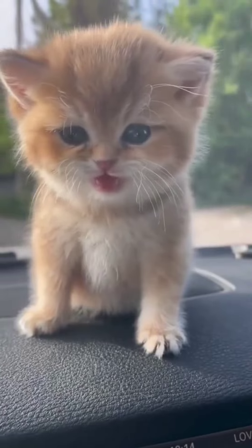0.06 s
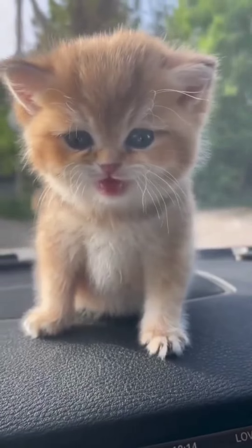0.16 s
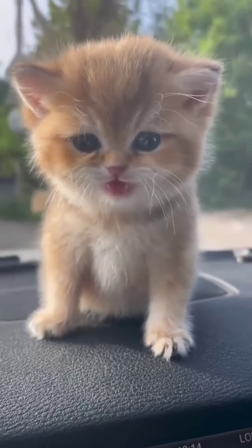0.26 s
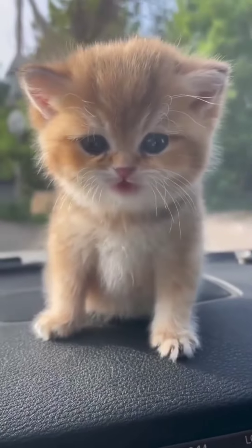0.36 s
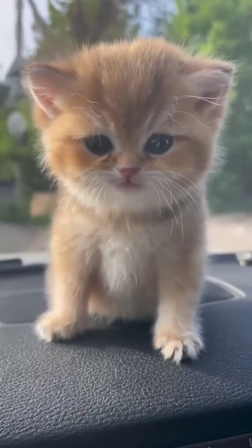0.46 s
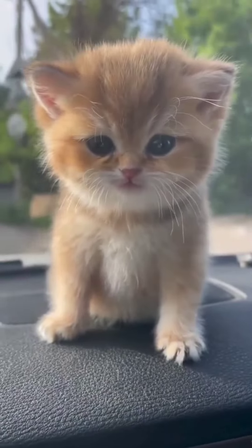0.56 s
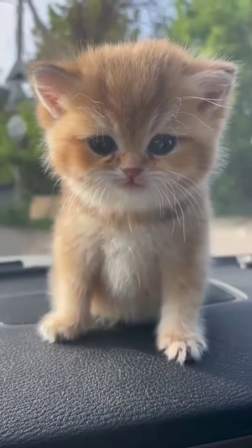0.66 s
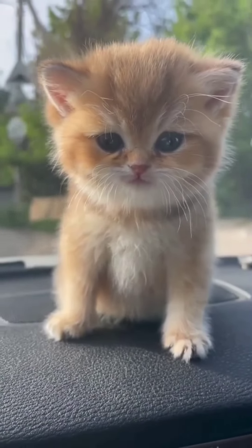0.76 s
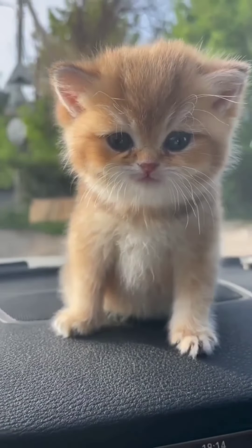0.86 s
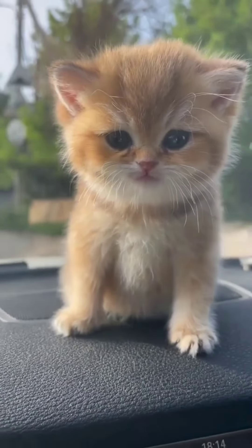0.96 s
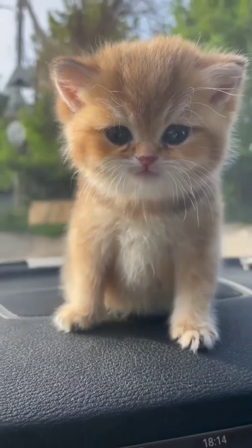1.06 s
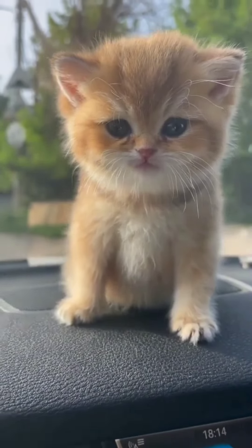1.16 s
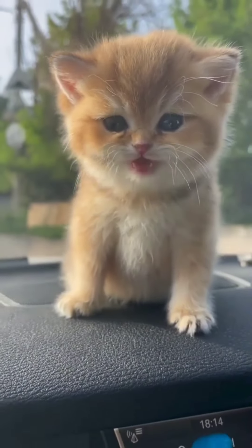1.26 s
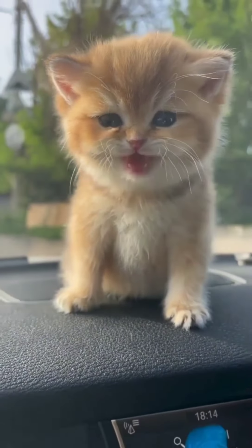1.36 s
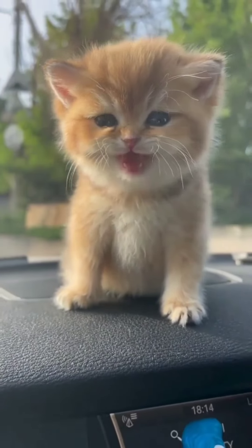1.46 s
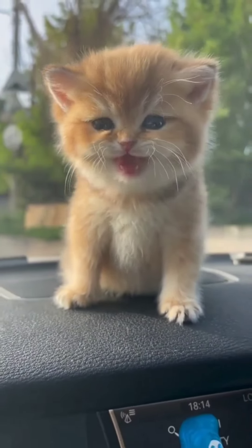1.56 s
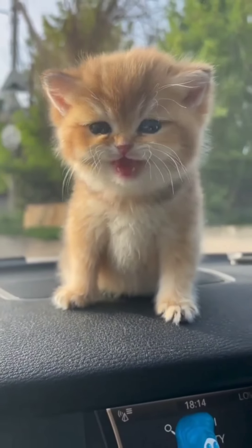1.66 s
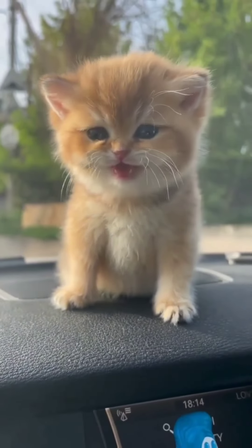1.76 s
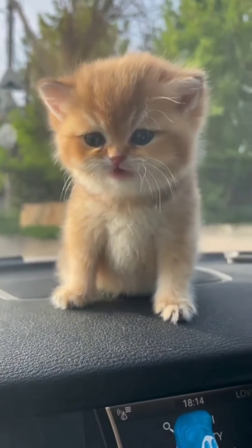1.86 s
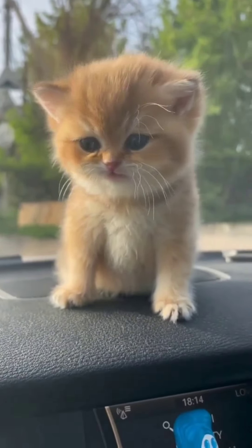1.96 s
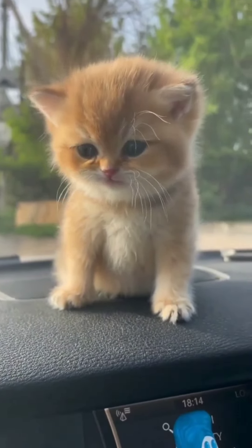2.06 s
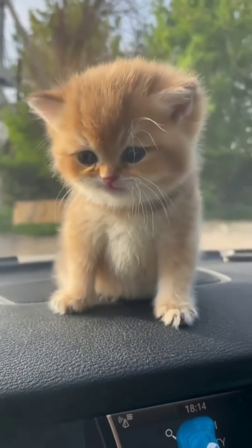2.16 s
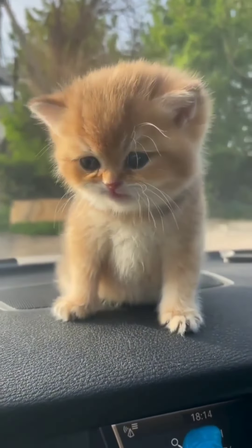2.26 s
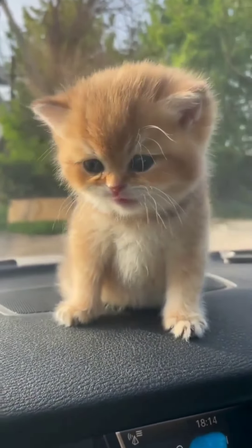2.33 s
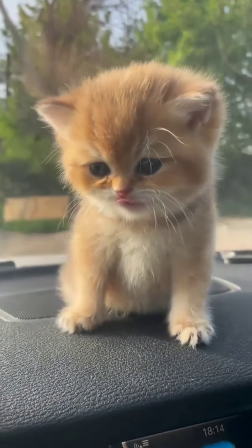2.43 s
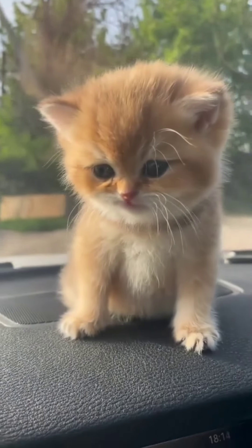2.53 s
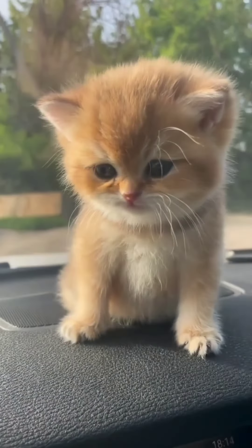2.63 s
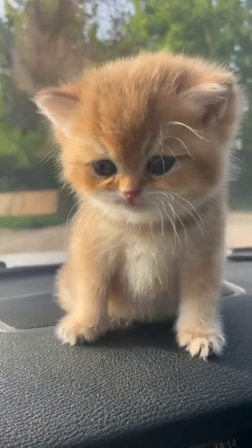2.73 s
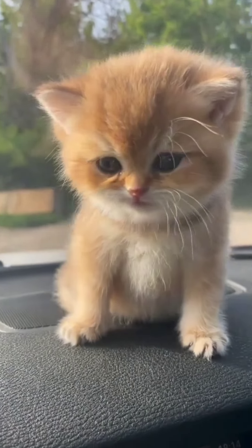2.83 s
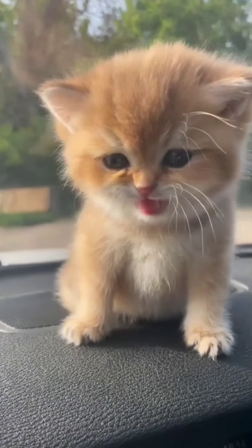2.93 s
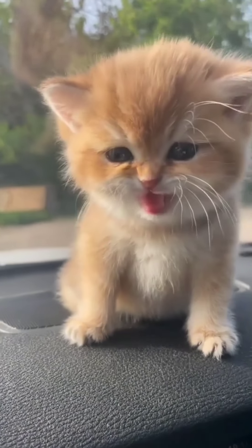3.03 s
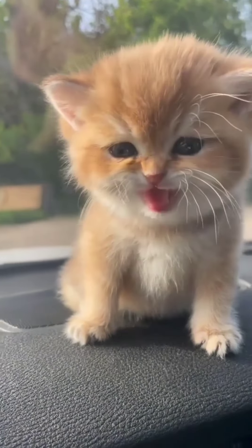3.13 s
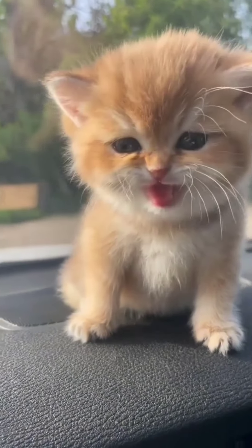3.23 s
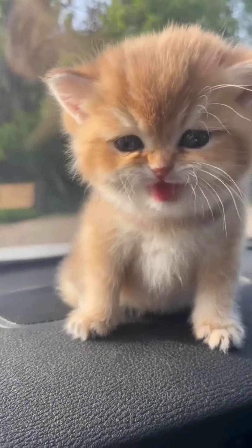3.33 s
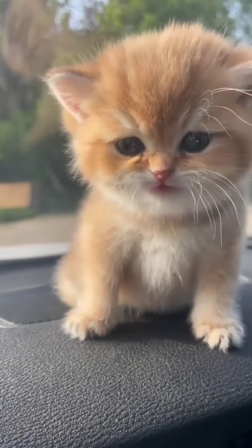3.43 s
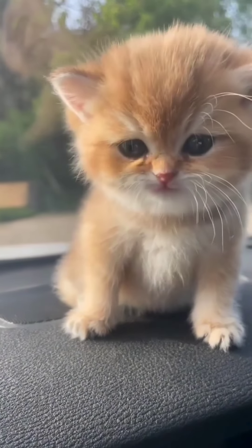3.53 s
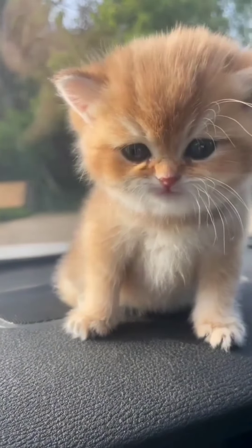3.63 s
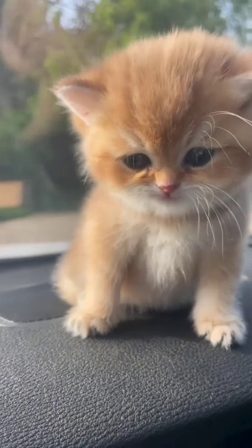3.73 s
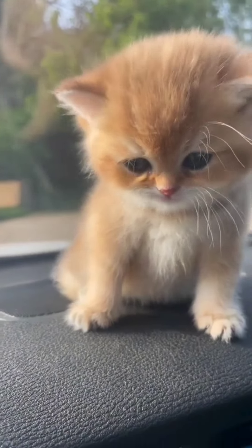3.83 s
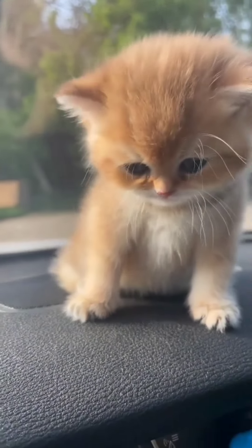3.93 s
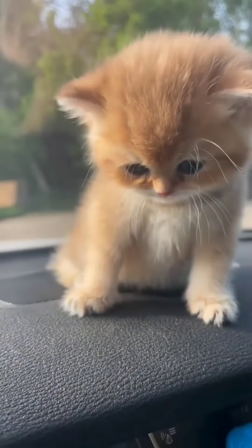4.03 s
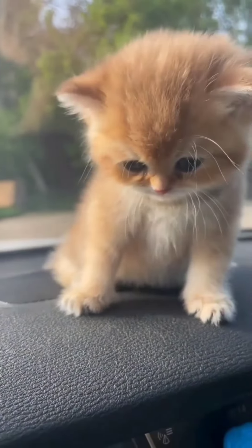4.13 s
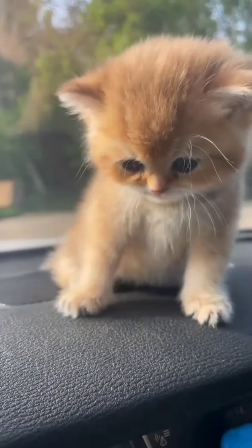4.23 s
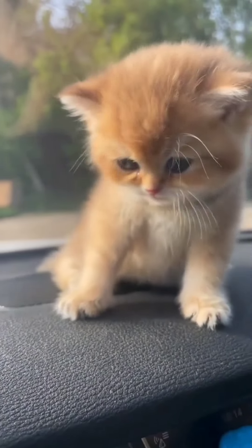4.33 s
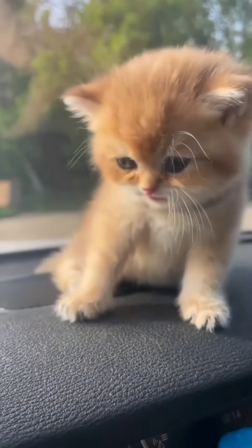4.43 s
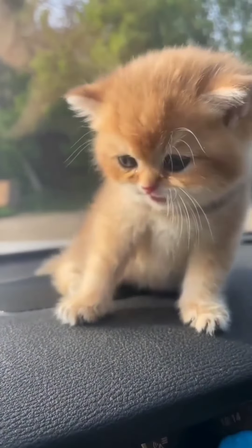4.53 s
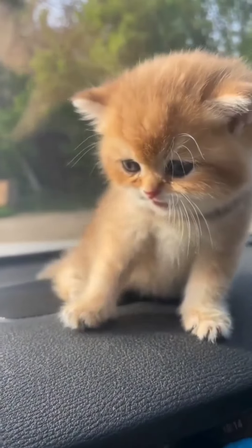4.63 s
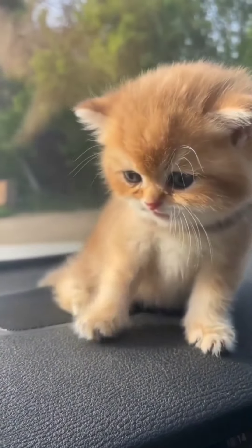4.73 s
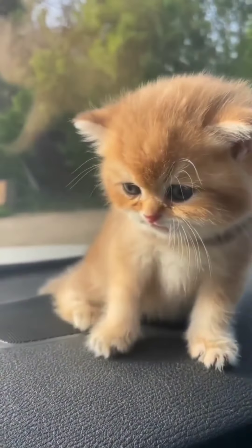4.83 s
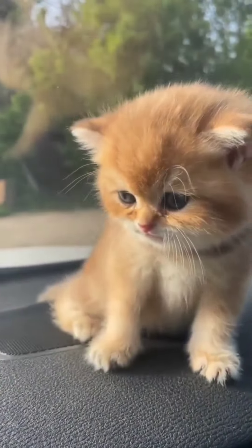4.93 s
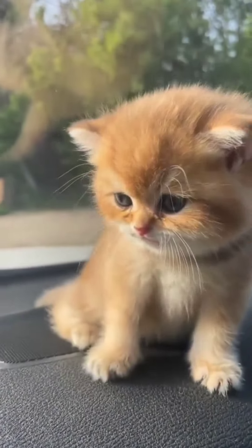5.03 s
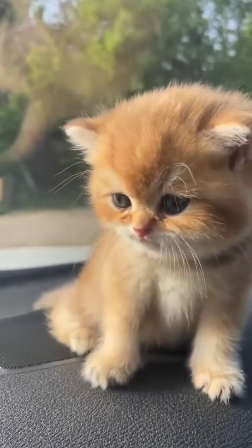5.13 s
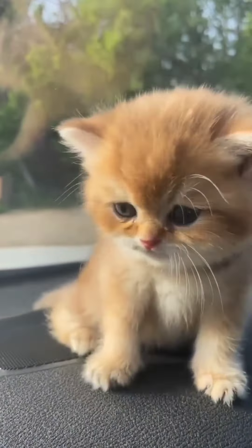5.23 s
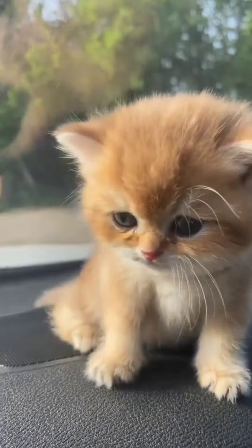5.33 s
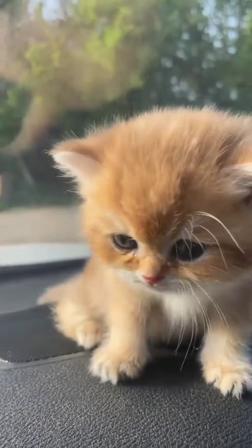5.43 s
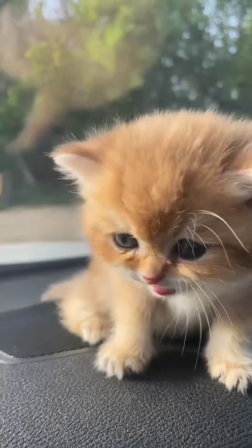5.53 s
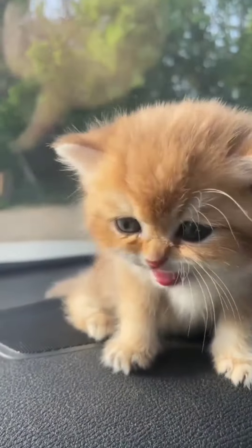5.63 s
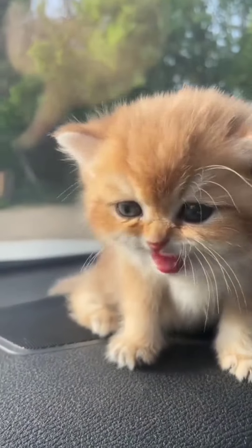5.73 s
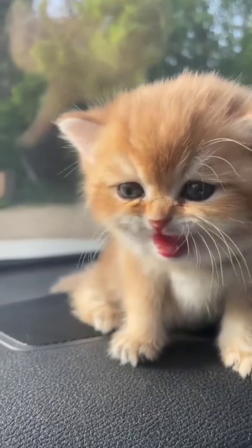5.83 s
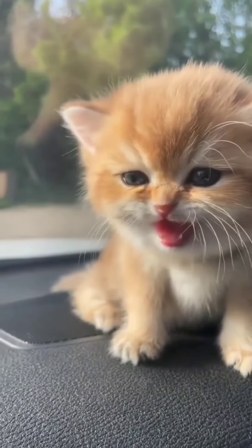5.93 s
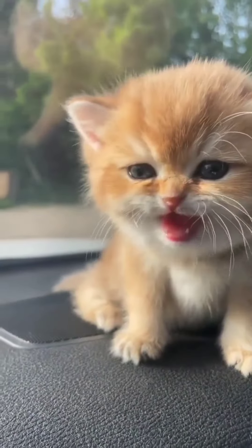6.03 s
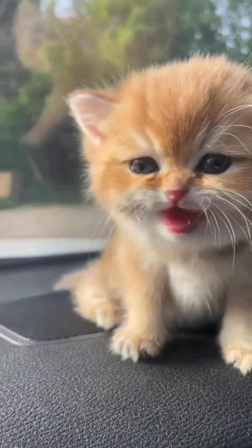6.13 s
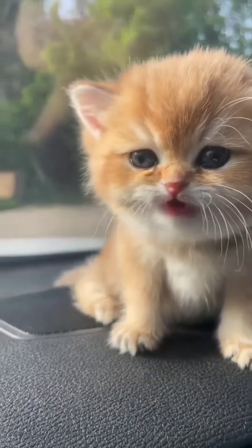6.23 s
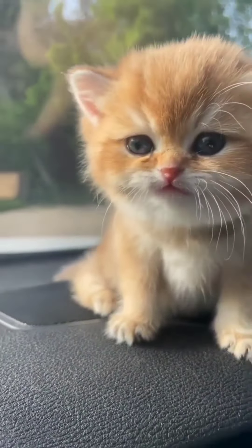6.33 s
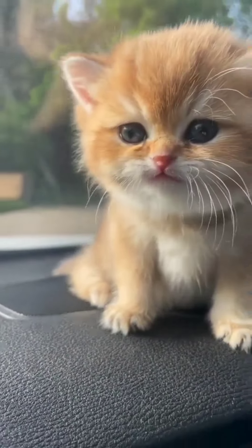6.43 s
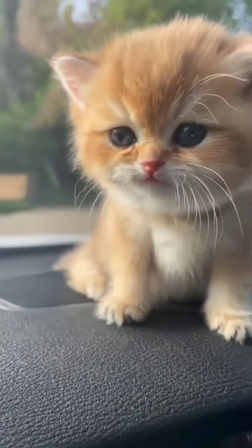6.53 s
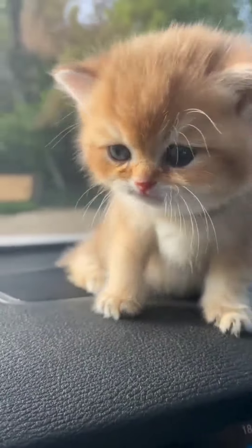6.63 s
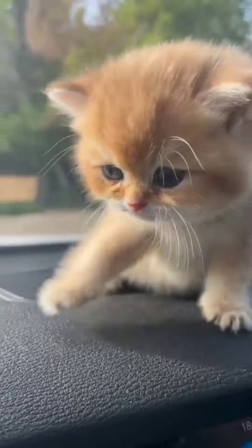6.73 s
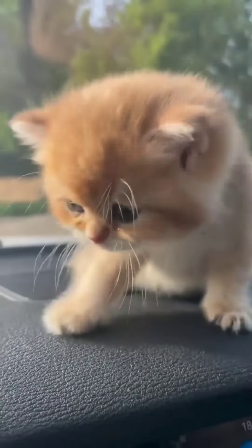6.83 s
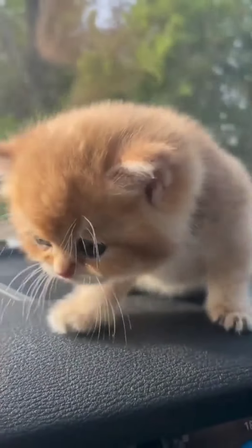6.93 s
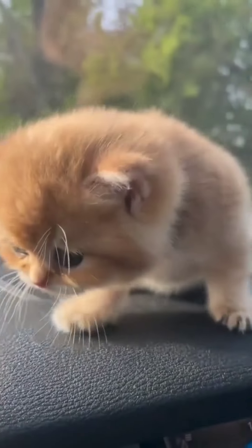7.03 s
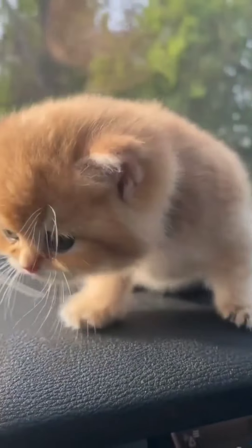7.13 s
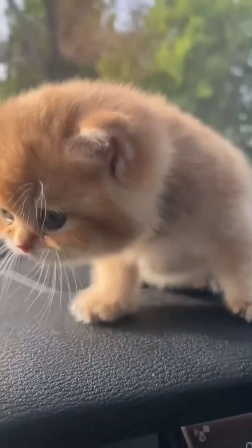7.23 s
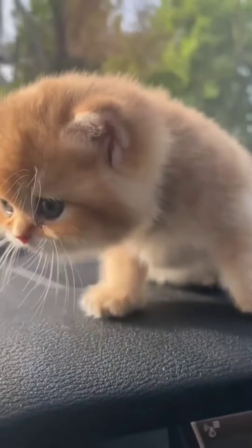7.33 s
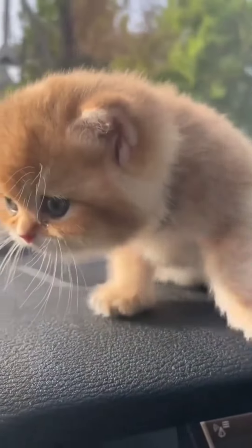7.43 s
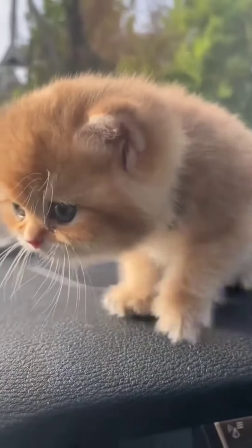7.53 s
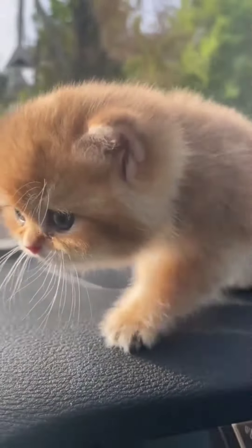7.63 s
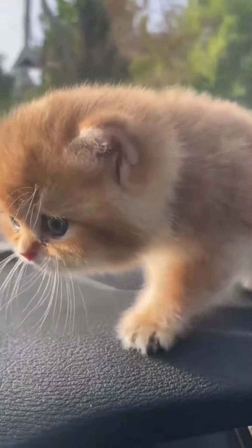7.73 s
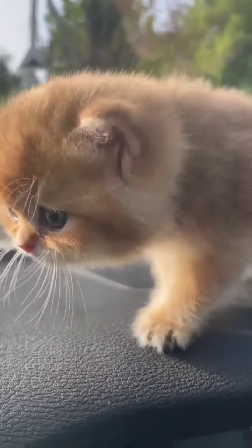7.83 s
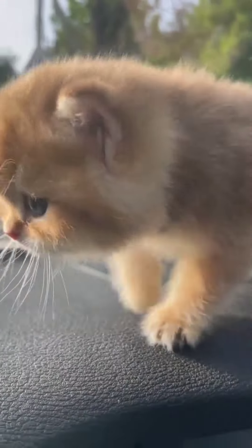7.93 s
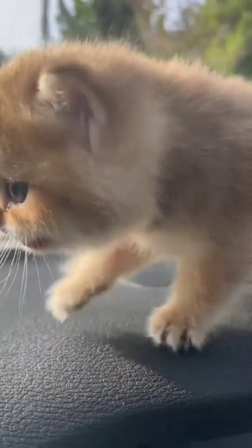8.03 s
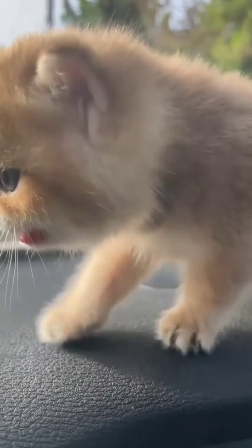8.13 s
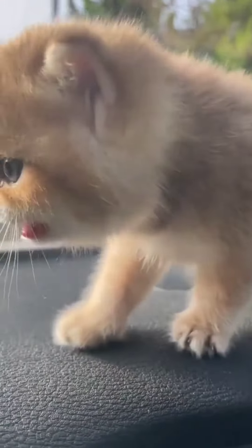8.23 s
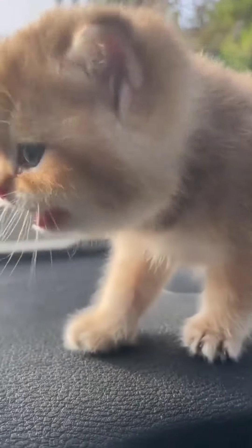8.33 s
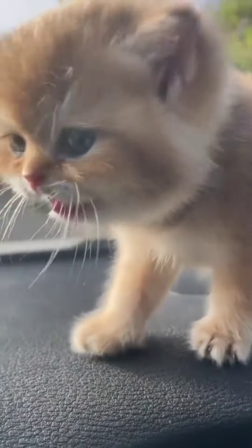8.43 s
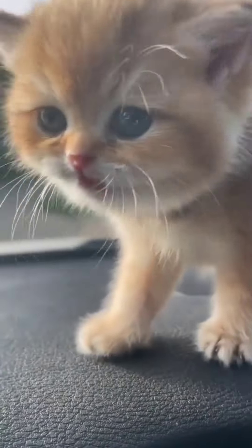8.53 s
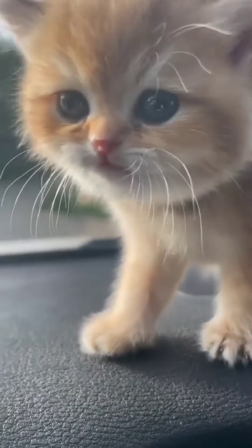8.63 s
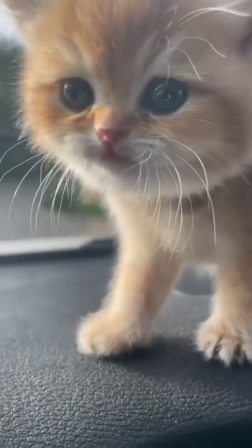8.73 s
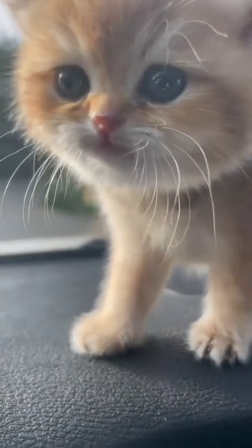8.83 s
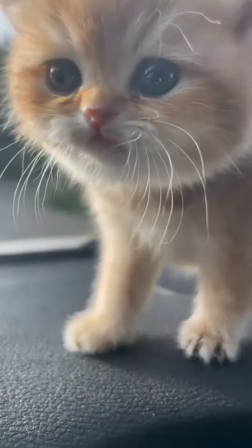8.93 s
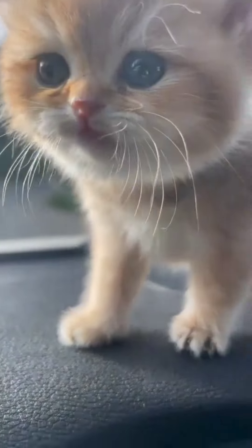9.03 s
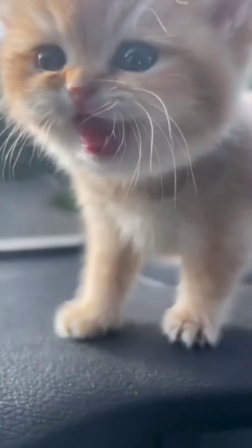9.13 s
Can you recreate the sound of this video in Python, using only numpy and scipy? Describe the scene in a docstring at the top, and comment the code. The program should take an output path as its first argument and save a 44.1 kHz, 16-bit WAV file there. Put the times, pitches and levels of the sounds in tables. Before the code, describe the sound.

A kitten close to the microphone in a car calls in thin, high, pleading mews, some cracking into hoarseness, the fifth the longest and brightest. Tiny wet mouth clicks and nose puffs fill the gaps. Beneath, a deep engine drone slowly drops, swells around seven seconds with faint paw rustles, then falls before an airy mew and a clipped final cry.

```python
"""A small kitten mews on the dashboard of a car whose engine, a pair of swept tones, rumbles from the start.
Pulsed partials shaped by resonances give five thin mews; strain makes them raspy or halves their pitch.
Between them come soft scuffs, lip smacks (decaying noise bursts) and sniffs (swelling noise), later squeaks.
The engine then swells for a while, paws brush the dashboard, a mew passes without voice, and a last short
mew follows. The windscreen and dashboard return all but the car's own sound as delayed copies."""
import sys
import numpy as np
from scipy import signal
from scipy.fft import rfft, irfft, next_fast_len
from scipy.io import wavfile
from scipy.ndimage import uniform_filter1d

SR = 44100
rng = np.random.default_rng(int(sys.argv[2]) if len(sys.argv) > 2 else 0)


def master_out(mix):
    """Clip the mix to full scale and print it as 16-bit PCM to the path in sys.argv[1]."""
    frames = np.transpose(np.atleast_2d(mix))
    ceiling = np.clip(frames, -1, 1)
    pcm = np.round(ceiling * 32767).astype(np.int16)
    wavfile.write(sys.argv[1], SR, pcm)


N = 404397  # length [samples]
T = np.arange(N) / SR  # time [s]
TOP_HZ = 13100  # upper limit of the sound


def undb(db):
    """Logarithmic level: decibels become an amplitude gain."""
    return 10 ** (np.asarray(db) / 20)


def curves(table, t=T):
    """Linear interpolation: the columns of a table are joined by straight lines in time."""
    s, *columns = np.transpose(table)
    return [np.interp(t, s, column) for column in columns]


def unit(x):
    """Normalization: a signal is scaled to rms 1."""
    return x / np.sqrt(np.mean(x ** 2) + 1e-30)


def shape(x, gain):
    """Linear filtering: the spectrum is multiplied by a gain that depends on frequency."""
    size = next_fast_len(len(x) + 2048)
    hz = np.fft.rfftfreq(size, 1 / SR) + 1  # the offset keeps zero out of divisions and logarithms
    return irfft(rfft(x, size) * gain(hz), size)[:len(x)]


def colour(x, tone):
    """Spectral envelope: the gain joins (frequency [Hz], gain [dB]) points over log frequency."""
    hz, db = np.transpose(tone)
    return shape(x, lambda f: undb(np.interp(np.log(f), np.log(hz), db)))


def band(x, lo_hz, hi_hz, order=12):
    """Band-pass filtering: the gain falls steeply on both sides of a band."""
    return shape(x, lambda f: 1 / (1 + (lo_hz / f) ** order) / (1 + (f / hi_hz) ** order))


def walk(rate_hz, size=N):
    """Low-pass noise: a smooth random fluctuation of rms 1."""
    return unit(shape(rng.standard_normal(size), lambda f: 1 / (1 + (f / rate_hz) ** 4)))


def steady(x, seconds=0.068):
    """Level control: dividing by the running rms holds a sound near rms 1."""
    power = np.abs(uniform_filter1d(x ** 2, int(seconds * SR)))
    return x / np.sqrt(power + 1e-5 * np.mean(x ** 2))


def gate(t, start, end, rise=0.0016, fall=0.0074):
    """Amplitude envelope: linear ramps [s] open and close a sound."""
    return np.clip((t - start) / rise, 0, 1) * np.clip((end - t) / fall, 0, 1)


def ease(u):
    """Raised-cosine transition: a smooth step from 0 to 1."""
    return np.sin(np.pi / 2 * np.clip(u, 0, 1)) ** 2


def spells(t, table):
    """Slow modulation: each (start, length, amount) swells, holds and fades in equal thirds."""
    total = 0
    for start, length, amount in table:
        to_nearest_edge = np.minimum(t - start, start + length - t)
        total = total + amount * ease(3 * to_nearest_edge / length)
    return total


def add(out, start, x):
    """Superposition: a sound is summed into the mix at its start time [s]."""
    i = max(int(start * SR), 0)
    out[i:i + len(x)] += x[:max(len(out) - i, 0)]


def glide_phase(hz):
    """Phase is the time integral of frequency."""
    return 2 * np.pi * np.cumsum(hz) / SR


def swishes(table, tone, grain_db):
    """Friction and flow noise: short swells of coloured noise with a grainy level."""
    out = np.zeros(N)
    for start, length, db in table:
        size = int(length * SR)
        grains = rng.standard_normal(size) * undb(grain_db * walk(220, size))
        add(out, start, unit(colour(grains, tone) * np.hanning(size)) * undb(db))
    return out


# engine speed: (time [s], boom frequency [Hz])
ENGINE = [(0.0, 39.2), (0.76, 38.35), (2.71, 36.36), (5.23, 29.27), (5.92, 29.32), (6.21, 31.18),
          (6.59, 40.29), (7.0, 42.23), (7.35, 40.9), (8.3, 31.81), (9.17, 30.24)]
# pushes on the throttle: (start [s], rise [s], hold [s], fall [s], depth [0-1])
PUSHES = [(1.9, 0.4, .25, .3, 0.19), (5.9, 1, 0.51, 1.15, 0.88), (8.397, .7, .3, .5, 0.31)]
# level that drives the road rumble: (time [s], level [dB])
ROAD = [(0.0, -70.5), (1.94, -70.5), (4.36, -63.5), (5.69, -63.5), (6.92, -54.5), (9.17, -63.5)]
# spectrum of the rumble, and of the faint hiss: (frequency [Hz], gain [dB])
RUMBLE_TONE = [(29, -27.5), (50, 0.5), (56, -4.5), (65, -8.5), (96, -5), (145, -25.5), (188, -19),
               (345, -37), (632, -44.5), (808, -54), (1720, -67), (2500, -61.5), (3250, -71), (5500, -120)]
HISS_TONE = [(530, -22.5), (900, -3), (2010, -5.5), (2410, -9.5), (2910, -7.5), (4110, -9.5),
             (13000, -15.5)]


def car(db_per_octave=9, shake=.25, hum_share=0.56, rumble_db=-.5, drone_db=1, hiss_db=-85):
    """Forced vibration: the engine booms at its own rate, over random road rumble and steady hiss."""
    boom_db, boom_surge_db = -54, 19  # coasting level at the median pitch, gain at full throttle
    hum_step_hz, hum_db, hum_surge_db = 47, -59.5, 9  # a weaker hum keeps a fixed step above the boom
    (hz,), (road_db,) = curves(ENGINE), curves(ROAD)
    throttle = 0
    for s, rise, hold, fall, depth in PUSHES:
        throttle = throttle + depth * (ease((T - s) / rise) - ease((T - s - rise - hold) / fall))
    hz = hz * (1 + .015 * walk(6))
    boom_level = boom_db + boom_surge_db * throttle + db_per_octave * np.log2(hz / np.median(hz))
    hum_level = hum_db + hum_surge_db * throttle + hum_share * (road_db - np.median(road_db))
    # the harder the engine pulls, the steadier its note
    uneven = shake * (1 - throttle / 2)
    engine = 0
    for line_hz, db in ((hz, boom_level), (hz + hum_step_hz, hum_level)):
        phase = glide_phase(line_hz)
        in_phase = np.sin(phase) * (1 + uneven * walk(5))
        quadrature = uneven * walk(4.5) * np.cos(phase)
        engine = engine + undb(db) * (in_phase + quadrature)
    rumble = band(colour(rng.standard_normal(N), RUMBLE_TONE), 102, 2500, order=4)
    rumble = rumble / np.std(band(rumble, 111.7, 410)) * undb(rumble_db + walk(13.0))
    drone = unit(band(rng.standard_normal(N), 39, 90, order=7)) * undb(drone_db)
    hiss = unit(colour(rng.standard_normal(N), HISS_TONE)) * undb(hiss_db)
    return engine + (rumble + drone) * undb(road_db) + hiss


def folds(hz, rasp, half, peak_hz, peak_db=7, peak_width_hz=550, tremor=.0036):
    """Self-sustained oscillation: the folds' buzz, partial by partial, and the phase of their cycle."""
    size = len(hz)
    pitch = hz * (1 + .045 * rasp * walk(260, size) + tremor * walk(110, size))
    phase = glide_phase(pitch)
    buzz = 0
    for k in np.arange(1, 35) / 2:
        if k % 1 == 0:
            # strain makes each harmonic flutter in level and phase, more so from the second upwards
            flutter = walk(150, size) + 1j * walk(150, size)
            partial = 1 + min(.5 * k, .8) * rasp * flutter
        else:
            # every second cycle differs, on and off: broken lines halfway between the harmonics
            partial = half * (.9 + .35 * (walk(35, size) + 1j * walk(35, size)))
        # the head moves, so each partial drifts through its own peaks and dips
        mouth_peak_db = peak_db / (1 + ((k * hz - peak_hz) / peak_width_hz) ** 2)
        db = mouth_peak_db + 3.2 * walk(9, size)
        audible = k * pitch < SR / 3
        buzz = buzz + audible * undb(db) * np.real(partial * np.exp(1j * k * phase))
    return buzz, phase


# the folds turn raspy under strain: (start [s], length [s], added rasp [0-1])
RASPS = [(.055, .075, .2), (.16, .08, .22), (1.29, .24, .3), (1.5, .21, .8), (2.95, .17, .19),
         (4.53, .1, .5), (4.67, .13, .95), (5.58, .14, .07), (5.75, .15, .06)]
# the folds drop to half pitch: (start [s], length [s], added share [0-1])
BREAKS = [(1.31, .28, .6), (2.93, .19, .3), (3.16, .1, .05), (4.66, .15, .1), (5.55, .1, .09)]


def mew(row, contour, tract):
    """Source and filter: the folds chop the airflow; throat, mouth and moving jaw shape the sound."""
    start, end, throat_db, sag_db, mouth_db, open_s, close_s, lost_db, from_hz, to_hz, onset_rasp, jet = row
    attack_s, release_s = 0.013, 0.03
    shut_db, closing_power, most_lost_db = 19.5, 1.65, 39  # treble held back by the jaw; it closes ever faster
    settle_s, calm_rasp, calm_half = .036, .014, .01  # the onset rasp settles to a trace of both
    air, low_gain_db = 1.35, -1.5  # turbulence under strain, gain of the lowest partial
    t = np.arange(start, end, 1 / SR)
    age, progress = t - start, (t - start) / (end - start)
    hz, low_db = curves(contour, t)
    # the folds start rough and soon settle
    onset = onset_rasp * np.exp(-(age / settle_s) ** 2 / 2)
    rasp = np.clip(calm_rasp + onset + spells(t, RASPS), 0, 1)
    half = calm_half + spells(t, BREAKS)
    closing = np.clip(1 - (end - t) / close_s, 0, 1) ** closing_power
    jaw_db = -shut_db * np.exp(-age / open_s) - np.minimum(lost_db * closing, most_lost_db)
    buzz, phase = folds(hz, rasp, half, from_hz + (to_hz - from_hz) * progress)
    # air escapes once a cycle: broadly under strain, and as a high hiss when the cry is forced
    noise = rng.standard_normal(len(t)) * (1 + np.cos(phase))
    breath = air * rasp * band(noise, 800, SR / 2, order=3)
    forced_hiss = jet * undb(jaw_db / 2) * band(noise, 5700, 8600) * undb(3 * walk(25, len(t)))
    voice = colour(buzz + breath + forced_hiss, tract)
    # a wide mouth lets the upper resonances out
    split_hz = 1.3 * np.median(hz)
    fundamental = steady(band(voice, 412.6, split_hz, order=16))
    throat = steady(band(voice, split_hz, 3830, order=16))
    mouth = steady(band(voice, 4030, TOP_HZ, order=24))
    sound = (undb(low_db + low_gain_db) * fundamental
             + undb(throat_db - sag_db * progress ** 2) * throat
             + undb(mouth_db + jaw_db) * mouth)
    out = np.zeros(N)
    add(out, start, sound * ease(age / attack_s) * ease((end - t) / release_s))
    return out


# mews: (start [s], end [s], throat band [dB], its sag by the end [dB], open-mouth band [dB],
#        jaw opening time constant [s], jaw closing time [s], treble lost on closing, before its cap [dB],
#        mouth resonance at the start [Hz], at the end [Hz], rasp at the onset [0-1], forced hiss [gain])
MEWS = [(0.041, 0.281, -58.5, 5, -71.5, 0.0037, 0.056, 18, 8900, 8750, 0.17, 0),
        (1.277, 1.857, -61, 4, -67, 0.0091, 0.43, 23, 6900, 6400, 0.5, 0.056),
        (2.929, 3.459, -60.5, 1, -44, 0.0077, .29, 53, 7700, 6600, 0.71, 0.52),
        (4.534, 4.794, -57, 2.5, -74, 0.0036, 0.3, 13, 5500, 5310, 1, 0),
        (5.54, 6.214, -52.5, 2, -39, .045, 0.32, 21, 6300, 3990, .8, .2),
        (9.138, 9.2, -45.5, -6, -42.5, 0.0024, .01, 0, 4370, 4470, 1, .38)]
# contour of each mew: (time [s], pitch [Hz], level of the lowest band before its gain [dB])
CONTOUR_A = [(0.052, 1406, -49.5), (0.074, 1374, -50), (0.094, 1387, -46.5), (0.19, 1460, -55.5),
             (0.242, 1460, -64.5), (0.268, 1396, -49.5)]
CONTOUR_B = [(1.29, 1120, -50), (1.314, 1074, -48.5), (1.334, 1121, -47.5), (1.494, 1194, -60),
             (1.562, 1085, -51.5), (1.632, 1048, -50), (1.736, 1297, -63.5), (1.788, 1308, -87),
             (1.85, 1245, -53)]
CONTOUR_C = [(2.945, 1032, -48.5), (2.969, 1048, -47.5), (3.083, 1030, -47.5), (3.205, 985, -56.5),
             (3.263, 963.4, -55.5), (3.367, 983.7, -56.5), (3.383, 1137, -49), (3.407, 1150, -70),
             (3.445, 1153, -60)]
CONTOUR_D = [(4.547, 771, -53.5), (4.589, 818, -49.5), (4.621, 789, -47.5), (4.693, 772, -53.5),
             (4.709, 815.4, -53), (4.725, 771, -51.5), (4.771, 815, -52), (4.785, 818, -68)]
CONTOUR_E = [(5.552, 745, -48), (5.568, 852, -50), (5.578, 910, -66), (5.598, 929, -52),
             (5.642, 967.5, -60), (5.75, 936, -55.5), (5.958, 903.5, -71), (6.188, 923, -61.5),
             (6.2, 908.7, -54)]
CONTOUR_F = [(9.145, 818, -58), (9.18, 820, -56)]
# resonances of throat and mouth in each mew: (frequency [Hz], gain [dB])
TRACT_A = [(800, -3), (1400, -8), (2000, -18), (2900, -23), (3600, -16), (4200, -31), (5700, -32),
           (7300, -23), (8700, -20.5), (10200, -30), (13000, -46)]
TRACT_B = [(400, 22.5), (570, -0.5), (1150, 6), (1750, -7.5), (2350, -17), (3000, -4.5), (3580, -19),
           (3900, -23), (4600, -28.5), (7000, -25), (8500, -23), (10300, -23.5), (13000, -33)]
TRACT_C = [(550, -19), (1000, 17), (1500, -11.5), (2100, -8), (3100, -8.5), (3600, -13), (4200, 0),
           (5000, -6), (6200, -3.5), (7400, 1), (8500, -21), (10300, -11.5), (11800, -12), (13000, -17.5)]
TRACT_D = [(400, 9), (780, -3.5), (1100, 10), (1550, -9.5), (1900, -32), (2400, -22.5), (3100, -11.5),
           (3500, -8.5), (3900, -21), (4700, -36), (5500, -29), (7000, -28), (10200, -19.5), (13000, -60)]
TRACT_E = [(500, -29), (800, -12.5), (1300, -6), (1850, -8), (2300, -17.5), (2800, -14), (3700, -11.5),
           (4600, -3.5), (6500, -6.5), (7500, -3.5), (8300, -9), (10200, -14), (11800, -16), (13000, -10.5)]
TRACT_F = [(800, -6), (1650, 1), (2400, -11), (3300, -16), (4150, 1), (5500, 1), (7800, 8), (9500, -11),
           (12000, -5)]


def mews():
    """Articulation: each mew joins its own pitch contour to its own tract resonances."""
    contours = CONTOUR_A, CONTOUR_B, CONTOUR_C, CONTOUR_D, CONTOUR_E, CONTOUR_F
    tracts = TRACT_A, TRACT_B, TRACT_C, TRACT_D, TRACT_E, TRACT_F
    return sum(mew(*call) for call in zip(MEWS, contours, tracts))


def side_branch(x, notch_hz=9350, width_hz=420, depth_db=-18):
    """Side-branch absorption: small pockets of the throat swallow one narrow band."""
    return shape(x, lambda f: undb(depth_db / (1 + ((f - notch_hz) / width_hz) ** 4)))


# early reflections from windscreen and dashboard: (delay [ms], gain [ratio])
ECHOES = [(.9, 0.0654), (2.3, 0.024), (4.102, 0.12)]


def cabin(x, tail_db=-21, width_db=-1, t60=.13):
    """Reflection and absorption: near glass echoes the sound, upholstery damps a tail wide only in treble."""
    t = np.arange(SR // 6) / SR
    tails = []
    for _ in range(2):
        decay = unit(rng.standard_normal(len(t)) * undb(-60 * t / t60)) / np.sqrt(len(t))
        tails.append(signal.fftconvolve(x, decay)[:N])
    mid, side = tails
    near = x + sum(gain * np.interp(T - ms / 1000, T, x) for ms, gain in ECHOES)
    # the side part enters the two channels with opposite sign
    width = undb(width_db) * band(side, 5200, TOP_HZ) * np.array([[1], [-1]])
    return near + undb(tail_db) * (mid + width)


# soft dull scuffs in the cabin: (start [s], length [s], centre [Hz], level before the common gain [dB])
SCUFFS = [(0.256, .2, 865, -73.5), (0.526, 0.13, 644, -71.5), (1.202, 0.1, 1080, -76),
          (4.079, 0.37, 376.4, -76), (8.137, 0.4, 648, -74.5)]


def scuffs(gain_db=-3):
    """Narrow-band noise: faint swells peak at one frequency and fall off on both sides."""
    out = np.zeros(N)
    for start, length, hz, db in SCUFFS:
        tone = [(hz / 2, -30), (hz, 0), (2 * hz, -40), (4 * hz, -70)]
        out += swishes([(start, length, db + gain_db)], tone, grain_db=-1.0)
    return out


# lip and tongue smacks: (start [s], lip tick [dB], jaw thump before its gain [dB], wet treble [dB])
SMACKS = [(0.387, -63, -59.5, -77), (1.91, -59.5, -58, -75), (2.265, -66.5, -62, -66.5),
          (2.703, -64.5, -92, -84), (2.847, -69, -87, -60), (3.5169, -57, -49, -72),
          (4.0272, -79, -90, -70), (4.809, -56.5, -48, -72), (5.438, -56.5, -76, -79),
          (6.2289, -56.5, -54, -81), (7.9175, -58.5, -58, -71.5), (8.4581, -59.5, -55, -61.5)]
# ring of the mouth: (frequency [Hz], gain [dB])
SMACK_TONE = [(120, -21), (200, -8), (431, -3), (852, -14.5), (1150, -19), (1740, -25), (2840, -19.5),
              (3510, -25), (3830, -26.5), (4250, -25.5), (4640, -36), (6030, -38), (6810, -44),
              (9330, -40.5), (13000, -37)]


def smacks(jaw_s=.0075, lip_s=0.0066, wet_s=0.0097, jaw_gain_db=2):
    """Impulsive excitation: parting or meeting lips tick and ring in the mouth, over a soft jaw knock."""
    out, t = np.zeros(N), np.arange(SR // 8) / SR
    for start, lip_db, jaw_db, wet_db in SMACKS:
        # (low edge [Hz], high edge [Hz], decay time constant [s], level [dB])
        parts = ((199, 970, jaw_s, jaw_db + jaw_gain_db), (1020, 6000, lip_s, lip_db),
                 (5300, 12100, wet_s, wet_db))
        for lo, hi, decay_s, level_db in parts:
            ring = steady(band(colour(rng.standard_normal(len(t)), SMACK_TONE), lo, hi, order=6))
            # a fast decay with a weak, slower tail
            decay = np.exp(-t / decay_s) + .1 * np.exp(-t / .02)
            add(out, start, ring * undb(level_db) * decay * gate(t, 0, 1, rise=.001))
    return out


# sniffs through the nose: (start [s], length [s], level [dB])
SNIFFS = [(1.16, 0.086, -82), (2.24, 0.15, -79.5), (2.59, 0.05, -76.5), (2.8, 0.05, -70),
          (2.835, 0.026, -60), (3.62, 0.16, -82.5), (4, 0.054, -83), (4.29, 0.11, -71), (5.435, 0.058, -74),
          (6.2, 0.085, -77.5), (8.05, 0.1, -73.5), (8.45, 0.046, -64), (9.07, 0.1, -59)]
# spectrum of air in the nose: (frequency [Hz], gain [dB])
SNIFF_TONE = [(1200, -17), (2500, -15), (3400, -17), (4200, -11), (5300, -4), (6500, -15.5), (7800, -10),
              (9300, -11.5), (10600, -10), (11800, -2.5), (13000, -8.5)]


def sniffs():
    """Turbulent flow: air rushing through the nose makes short swells of grainy noise."""
    return swishes(SNIFFS, SNIFF_TONE, grain_db=4.5)


# squeaks of the folds in their high register: (start [s], length [s], pitch [Hz], level [dB])
SQUEAKS = [(4.674, 0.084, 1065, -58.5), (4.72, 0.082, 1028, -57), (5.438, 0.014, 1013, -53),
           (6.201, 0.033, 1091, -49)]


def squeaks(slope_db=-17, waver=0.012):
    """Harmonic series: four partials falling steeply per octave make short, nearly pure notes."""
    out = np.zeros(N)
    for start, length, hz, db in SQUEAKS:
        t = np.arange(int(length * SR)) / SR
        phase = glide_phase(hz * (1 + waver * walk(160, len(t))))
        note = sum(undb(slope_db * np.log2(k)) * np.sin(k * phase) for k in range(1, 5))
        add(out, start, unit(note) * gate(t, 0, length) * undb(db))
    return out


# paws brushing the dashboard: (start [s], length [s], level [dB])
PAWS = [(6.78, 0.089, -79), (6.875, 0.049, -65.5), (6.94, 0.08, -64), (7.21, 0.012, -76.5),
        (7.3, 0.12, -81.5), (7.455, 0.035, -78)]
# spectrum of fur on plastic: (frequency [Hz], gain [dB])
PAW_TONE = [(470, -39), (800, 2), (1010, -1.5), (1710, -7.5), (2340, -4.5), (3690, -14.5), (5360, -11),
            (7690, -24), (10300, -22), (13000, -20)]


def paws():
    """Sliding friction: fur on plastic makes short swells of grainy noise."""
    return swishes(PAWS, PAW_TONE, grain_db=3.5)


# a voiceless mew: (start [s], end [s], level [dB])
WHISPER = (8.06, 8.42, -67.5)
# spectrum of its breath: (frequency [Hz], gain [dB])
WHISPER_TONE = [(410, 0.5), (700, 5), (791, -27), (962, -9), (1530, 1), (1770, -6.5), (2650, -11),
                (2890, -25), (3310, -14), (3880, -19.5), (5590, -13.5), (6240, -6.5), (8070, -13),
                (8680, -32), (13000, -20)]
# faint whistle as the jaw closes: (start [s], length [s], from [Hz], to [Hz], level [dB])
WHISPER_HISS = (8.14, .22, 6600, 6100, -73)


def whisper(rise_s=.06, fall_s=0.18, flutter_db=2, whistle_width_hz=260):
    """Aspiration: air passes the open mouth in uneven puffs without setting the folds going."""
    start, end, db = WHISPER
    breath = unit(colour(rng.standard_normal(N), WHISPER_TONE))
    air = breath * gate(T, start, end, rise_s, fall_s) * undb(db + flutter_db * walk(60))
    s, length, from_hz, to_hz, hiss_db = WHISPER_HISS
    size = int(length * SR)
    phase = glide_phase(np.linspace(from_hz, to_hz, size))
    # noise on both quadratures of a gliding carrier: a narrow moving band
    whistle = walk(whistle_width_hz, size) * np.cos(phase) + walk(whistle_width_hz, size) * np.sin(phase)
    add(air, s, unit(whistle * np.hanning(size)) * undb(hiss_db))
    return air


def scene():
    """Superposition: the kitten and the scuffs sound in the reflecting cabin, over the car."""
    throat = side_branch(mews() + squeaks() + whisper())
    kitten = throat + smacks() + sniffs() + paws()
    return cabin(kitten + scuffs()) + car()


def record(dry):
    """Band limiting: a steep elliptic low-pass cuts the top of the spectrum."""
    return signal.sosfilt(signal.ellip(10, .2, 70, TOP_HZ, fs=SR, output="sos"), dry)


dry = scene()
out = record(dry)
master_out(out)
```